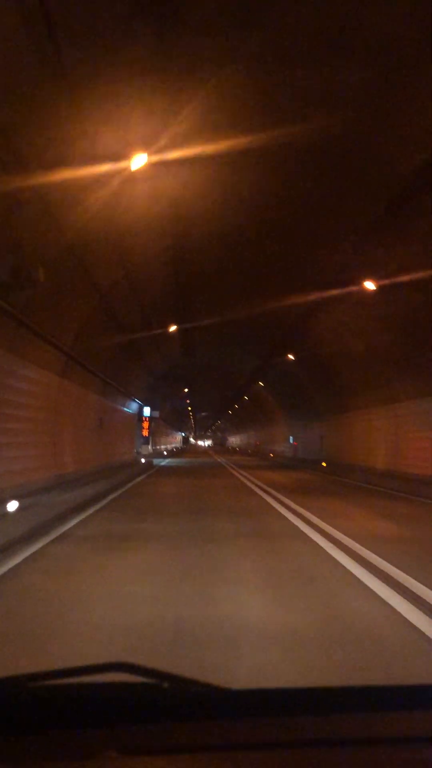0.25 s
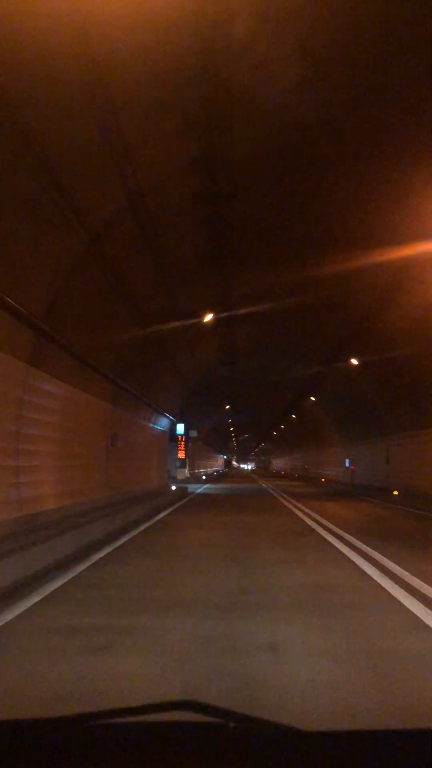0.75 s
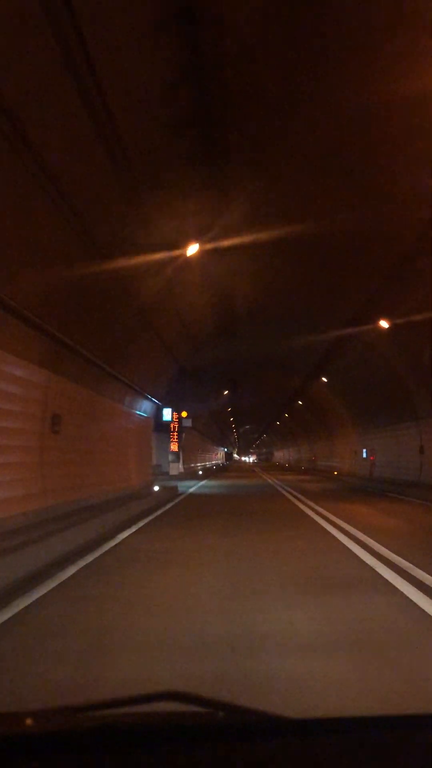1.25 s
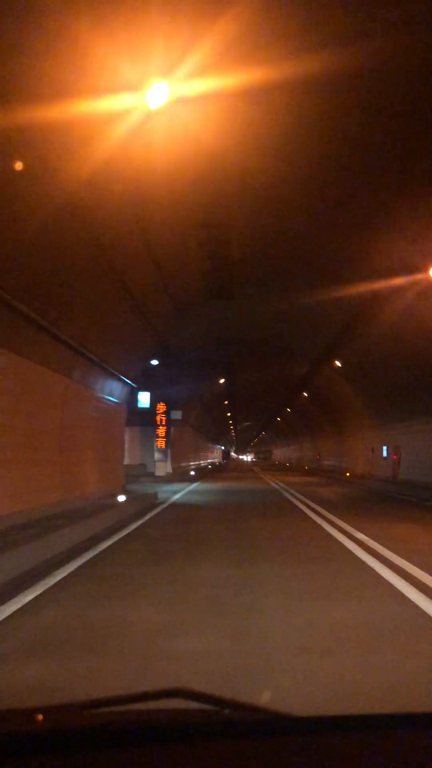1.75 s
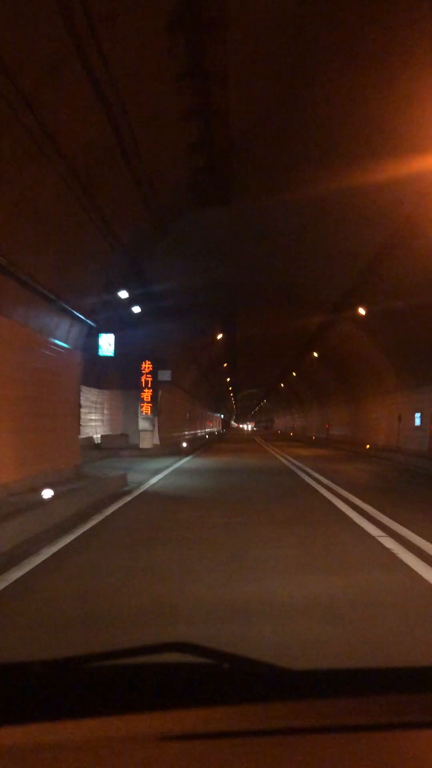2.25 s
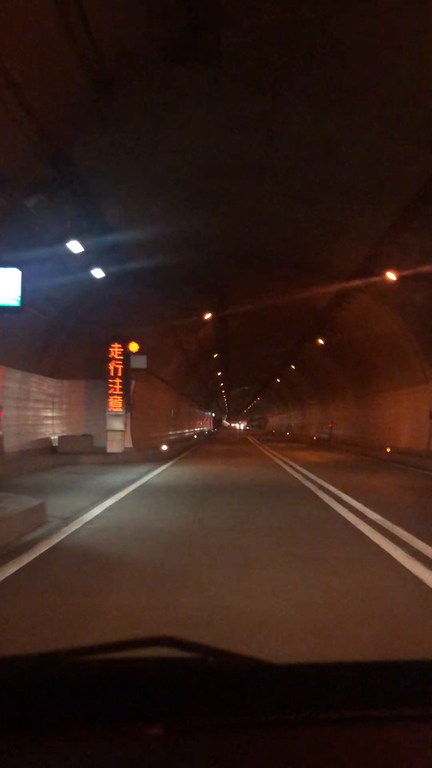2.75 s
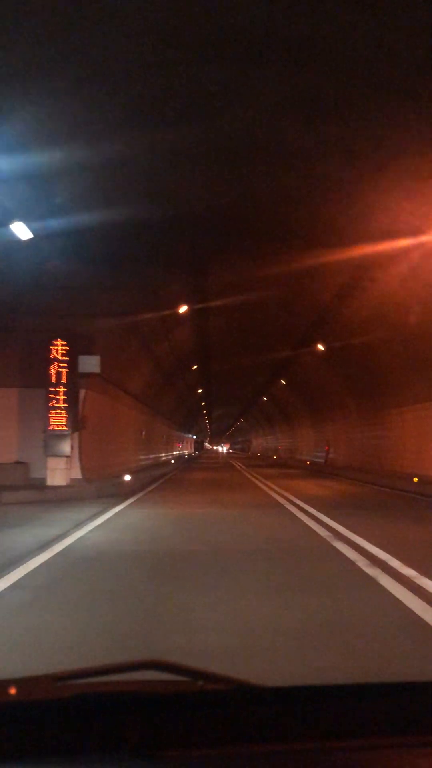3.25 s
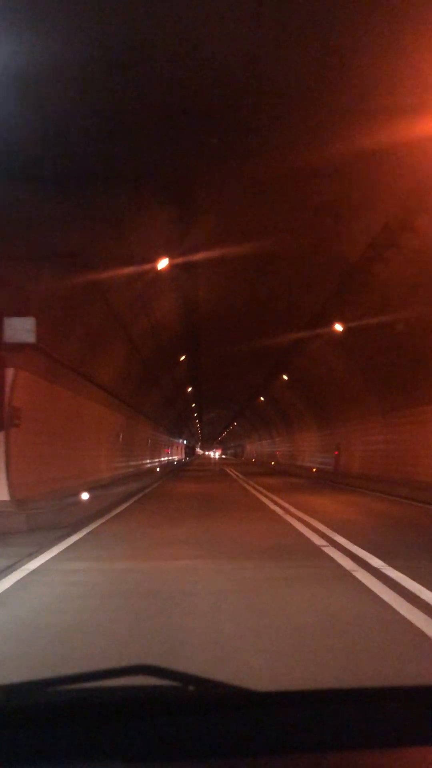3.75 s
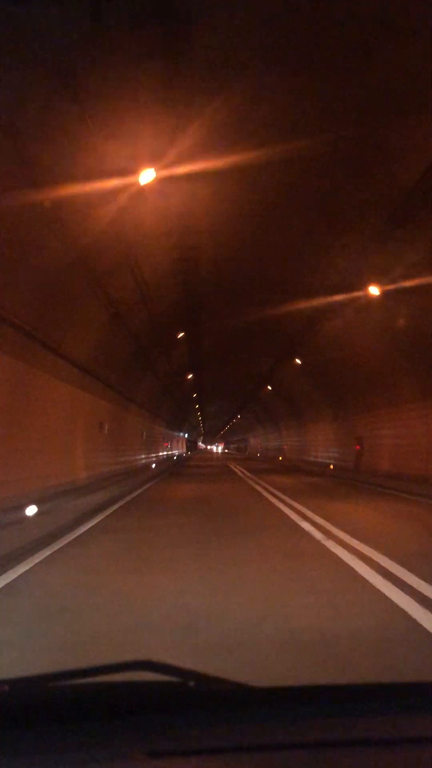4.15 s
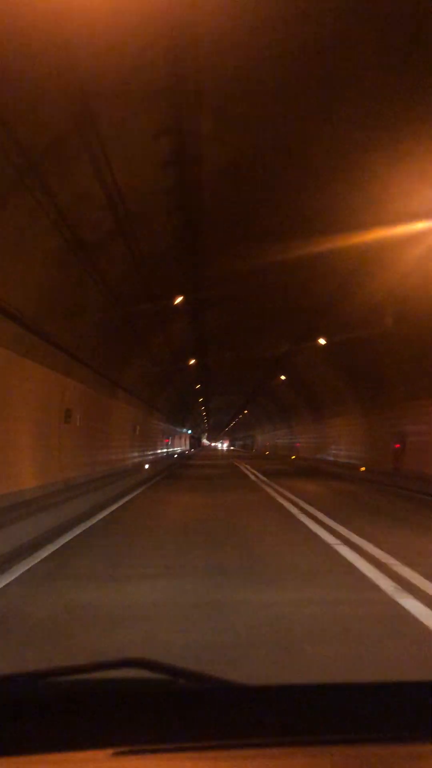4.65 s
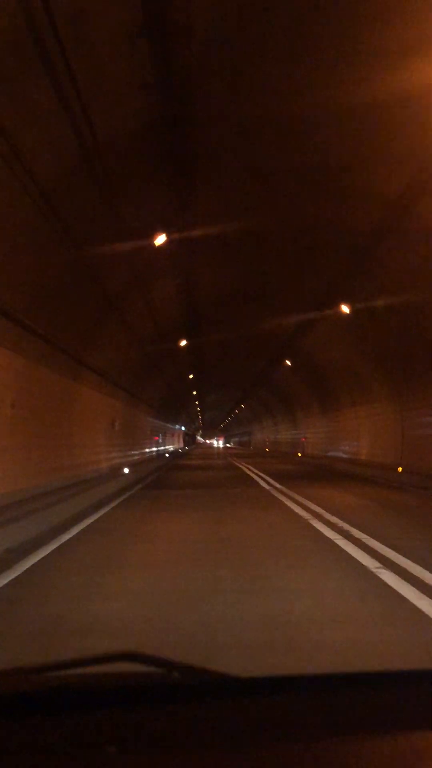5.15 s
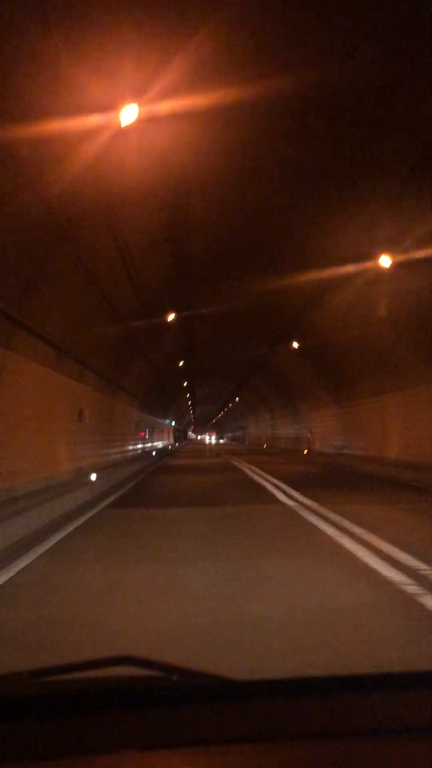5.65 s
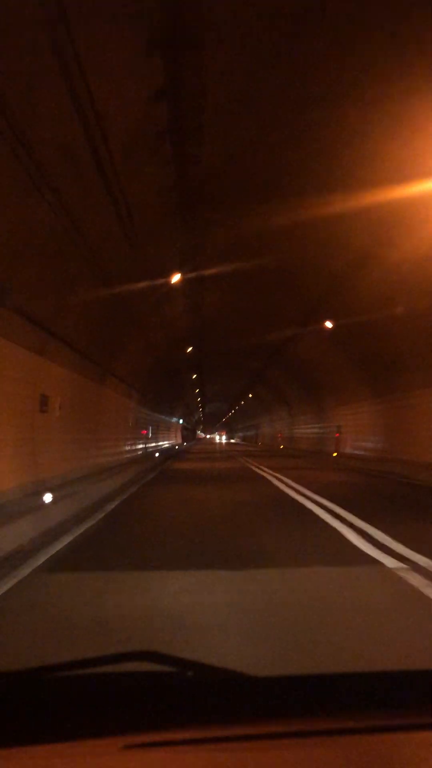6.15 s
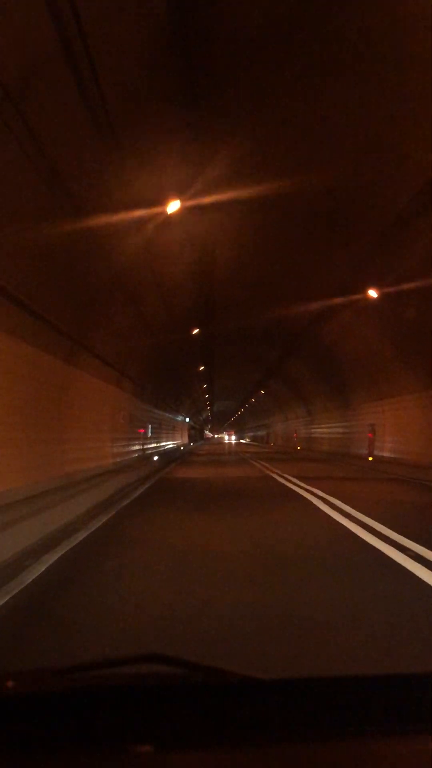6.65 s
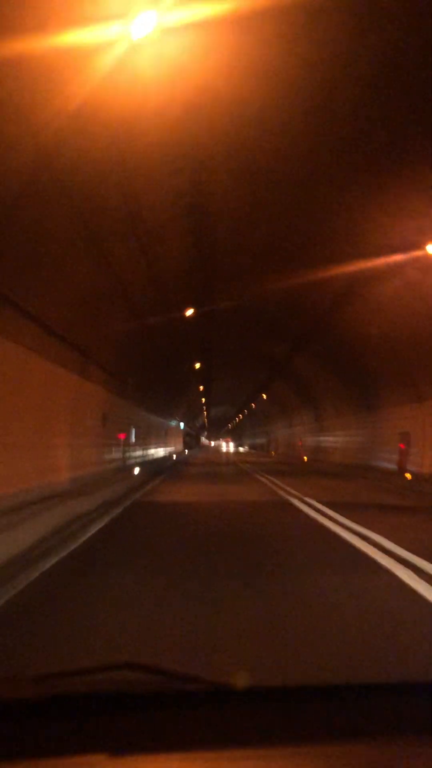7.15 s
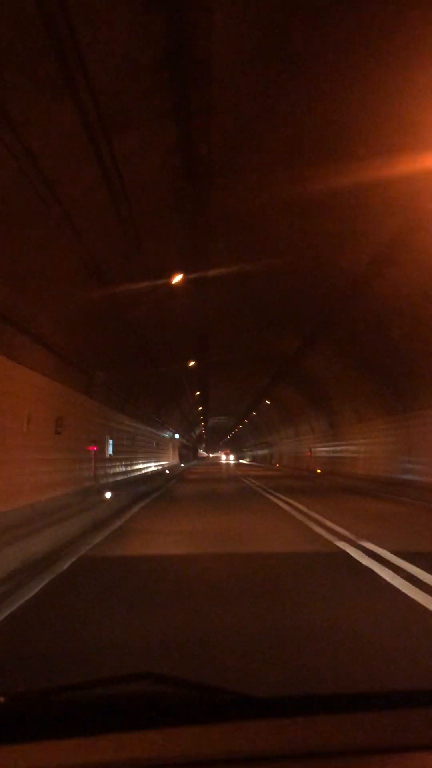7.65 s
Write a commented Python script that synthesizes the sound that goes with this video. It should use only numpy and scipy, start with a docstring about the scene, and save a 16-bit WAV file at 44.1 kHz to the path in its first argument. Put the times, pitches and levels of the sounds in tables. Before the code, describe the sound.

Low road rumble and tyre drone inside a car in a tunnel, booming harder as bumps and rough paving rattle the plastic trim.

```python
"""A car's body booms as the road shakes it, heard from the front seat, windows shut, in a road tunnel.
The road also makes the tyres ring, and the tunnel throws their roar back through the glass.
The engine hums low underneath. A joint in the road and then a stretch of rough paving
make the cabin boom harder and the loose dashboard trim rattle."""
import sys
import numpy as np
from scipy import signal
from scipy.fft import rfft, irfft, next_fast_len
from scipy.io import wavfile
from scipy.ndimage import uniform_filter1d

SR = 44100
rng = np.random.default_rng(int(sys.argv[2]) if len(sys.argv) > 2 else 0)


def generate_wav(signal):
    """Clip the signal to [-1, 1] and save it as 16-bit WAV at the path in sys.argv[1]."""
    frames = np.transpose(np.atleast_2d(signal))
    scaled = np.clip(frames, -1, 1) * 32767
    pcm = np.round(scaled).astype(np.int16)
    wavfile.write(sys.argv[1], SR, pcm)


N = 348831

# The tones of the engine's hum. Each row: multiple of the firing rate, level in dB.
ENGINE_TONES = [(1, -43.5), (2, -47), (3, -63)]
# The tunnel's roar behind the glass. Each row: frequency in Hz, relative level in dB.
ROAR_SPECTRUM = [(150, -8.5), (400, 3.5), (580, -0.5), (720, 0), (950, -0.5), (1200, -5.5), (1800, -8),
                 (2400, -13.5), (3000, -17), (3800, -19), (5500, -27), (8000, -34.5), (11000, -42.5),
                 (15500, -54)]
# Where windows and door seals ring. Each row: pitch in Hz, width in Hz, boost in dB.
GLASS_RINGS = [(704, 51, 2), (953, 61, 3), (1016, 27, 1), (1316, 20, 4.5), (1568, 38, 5), (1875, 92, 5),
               (2238, 32, 5.5), (3375, 55, 6), (3750, 78, 4), (4710, 80, 4.5)]
# The sound of rubbing trim. Each row: frequency in Hz, relative level in dB.
RUB_SPECTRUM = [(800, -14), (2500, 7.5), (4500, 8.0), (8000, 3.0), (12500, -3), (16000, -6)]
# Bouts of rubbing as the trim shifts. Each row: start in seconds, hold in seconds, level in dB.
RUB_BOUTS = [(.03, .04, -62.5), (1.06, .12, -68), (1.317, .12, -62), (1.87, .14, -65.5), (3.47, .04, -66),
             (4.05, .15, -71), (4.437, 0.077, -57), (4.57, .08, -65), (6.738, 0.046, -60.5),
             (6.86, .02, -61), (6.91, 0.038, -58), (7.04, .015, -56), (7.074, .045, -50),
             (7.26, 0.065, -62)]
# Knocks of the trim. Each row: time in seconds, level in dB, boost of the snap and ring in dB.
TRIM_KNOCKS = [(1.195, -48, -7), (4.448, -37, 7.5), (4.478, -41, -12), (4.508, -40, -11), (6.771, -45, -11),
               (6.883, -43, -13), (6.917, -40, 1), (7.016, -47, -8), (7.051, -41, 4), (7.07, -37, -1),
               (7.074, -37, 2.5), (7.101, -40, 1), (7.15, -40, -16), (7.261, -40, 6), (7.294, -48, 8),
               (7.302, -45, 9), (7.337, -42, -5), (7.399, -41, -12), (7.464, -42, -4), (7.514, -47, -8),
               (7.689, -53, 10), (7.774, -48, -6), (7.826, -50, -8), (7.886, -57, -13)]
# The plastic panel's ring. Each row: pitch in Hz, seconds to fade by 60 dB, relative level in dB.
PANEL_TONES = [(2370, .025, -2), (2890, 0.049, 1.5), (3610, 0.038, -4.5), (4670, 0.03, -13),
               (5800, 0.025, -9), (8200, .02, -19)]
# Tyre drone coming through the suspension. Each row: frequency in Hz, relative level in dB.
DRONE_SPECTRUM = [(70, -38), (130, -3.5), (175, 2.5), (215, -3), (270, -2.5), (340, -3), (362, -10),
                  (430, -14.5), (560, -25.5), (1200, -60)]
# Where the tyres and the air in them ring. Each row: pitch in Hz, width in Hz, boost in dB.
TYRE_RINGS = [(263.2, 17.3, 7.5), (284.3, 5.3, 4.5), (323.4, 21, 4), (367, 9, 2.5), (490.5, 24, 11.5)]
# The grain of the paving, heard as tyre drone. Each row: time in seconds, level in dB.
ROAD_GRAIN = [(0, -34.5), (.7, -32.5), (1.15, -34), (2.3, -34), (3.6, -33.5), (4.75, -34.5), (6.1, -33.5),
              (6.6, -34.5), (6.74, -31), (6.9, -34.5), (7.4, -35), (7.91, -39.5)]
# Blows of the road on the wheels. Each row: middle in seconds, level in dB, pitch in Hz,
# seconds to fade to about a third.
WHEEL_BUMPS = [(0.477, -19, 285, 0.0047), (0.95, -23.5, 55, 0.055), (1.954, -19.5, 70, 0.022),
               (2.419, -24, 42, .06), (4.428, -17.5, 295, 0.0075), (4.564, -17, 56.4, 0.014),
               (4.63, -15.5, 42.3, .04), (4.706, -16.5, 52, 0.018), (6.711, -26, 280, 0.013),
               (6.743, -21, 115, 0.021), (7.1, -11, 44.3, 0.027), (7.143, -24, 185, 0.018),
               (7.214, -12.5, 51.7, 0.018)]
# The boom of the car's body. Each row: frequency in Hz, relative level in dB.
BOOM_SPECTRUM = [(15, -46), (25, -34), (32, -30), (39, -2.5), (60, 0), (85, -2), (120, -3), (142, -10),
                 (190, -18), (280, -26), (500, -51), (1200, -74.5)]
# Where the cabin air rings (standing waves). Each row: pitch in Hz, width in Hz, boost in dB.
CABIN_RINGS = [(40.2, 3.1, 7), (73.7, 7.3, 0), (92, 17, 1), (125.2, 4.2, 7)]
# How hard the road shakes the body, most at the joint and the rough paving.
# Each row: time in seconds, level in dB.
BODY_SHAKE = [(0, -28), (.55, -27), (.75, -29.5), (1.7, -28.5), (2.35, -27), (2.95, -28), (3.25, -26.5),
              (3.8, -28), (4.2, -25), (4.65, -24.5), (4.85, -27.5), (6.0, -30), (6.7, -28), (6.8, -22),
              (7.3, -21.5), (7.65, -23.5), (7.85, -23.5), (7.91, -21)]

PATCHES_PER_S = 6  # the paving varies from patch to patch


def gain(db):
    """Turn decibels into a number to multiply by."""
    return 10 ** (np.asarray(db) / 20)


def normalise(x):
    """Scale a sound to an average (rms) level of 1."""
    return x / np.sqrt(np.mean(x ** 2))


def curve(table):
    """Join rows of time and level with straight lines."""
    times, levels = np.array(table).T
    return np.interp(np.arange(N) / SR, times, levels)


def wander(per_s):
    """A smooth random drift, typically about 1 away from zero."""
    hold = int(SR / per_s)
    steps = np.repeat(rng.standard_normal(N // hold + 1), hold)
    return 1.304 * uniform_filter1d(uniform_filter1d(steps, hold), hold)[:N]


def colour(x, spectrum, rings=()):
    """Give a sound a broad tone with ringing pitches standing out; its level comes out as 1."""
    size = next_fast_len(N)
    hz = np.maximum(np.fft.rfftfreq(size, 1 / SR), 1)
    points = np.array(spectrum)
    db = np.interp(np.log(hz), np.log(points[:, 0]), points[:, 1])
    for centre, width, boost in rings:
        db = db + boost / (1 + (2 * (hz - centre) / width) ** 2)
    return normalise(irfft(rfft(x, size) * gain(db), size)[:N])


def steady(x, span_s):
    """Even out the slow swells of a vibration, keeping its quick flutter."""
    span = max(int(span_s * SR), 1)
    return x / np.sqrt(uniform_filter1d(uniform_filter1d(x ** 2, span), span) + 1e-9)


def reflect(x, spread_s, echo_db, count=24):
    """Add many faint echoes off glass and trim; the level comes out as 1."""
    out = x.copy()
    lags = rng.integers(60, int(spread_s * SR) + 61, count)
    for lag, size in zip(lags, rng.standard_normal(count)):
        out[lag:] += gain(echo_db) * size * x[:-lag]
    return normalise(out)


def add(track, start_s, sound):
    """Mix a short sound in at a given time."""
    i = min(max(int(start_s * SR), 0), N)
    track[i:i + len(sound)] += sound[:N - i]


def engine_hum(firing_hz=74.16):
    """The engine fires at a nearly even speed and load, making a few low tones."""
    phase = 2 * np.pi * np.cumsum(firing_hz * (1 + 0.0068 * wander(1.987))) / SR
    return sum(gain(db + 2 * wander(5)) * np.sqrt(2) * np.sin(round(multiple) * phase)
               for multiple, db in ENGINE_TONES)


def tunnel_roar(level_db=-42, ease_db=0.6):
    """Tyre hiss, smoothed by countless wall echoes, comes back in through the windows."""
    hiss = colour(rng.standard_normal(N), ROAR_SPECTRUM, GLASS_RINGS)
    roar = reflect(hiss, spread_s=.06, echo_db=-26.5)
    grain_db = curve(ROAD_GRAIN)
    paving_db = 0.23 * (grain_db - grain_db.mean())  # a little louder when the tyres drone more
    easing_db = ease_db * np.linspace(.5, -.5, N)
    return roar * gain(level_db + easing_db + paving_db + 0.47 * wander(7))


def trim_rubbing(contacts_per_s=5000, usual_db=-74, rise_s=0.017, fall_s=.035):
    """Loose trim rubs in tiny contacts: faintly with the shaking, in bouts as the dashboard sways."""
    contacts = (rng.random(N) < contacts_per_s / SR) * rng.standard_normal(N)
    rub = colour(contacts * gain(2.6 * wander(160)), RUB_SPECTRUM)
    t, shake_db = np.arange(N) / SR, curve(BODY_SHAKE)
    power = gain(usual_db + 1.8 * (shake_db - np.median(shake_db))) ** 2
    for start, hold, db in RUB_BOUTS:
        rise = np.clip(1 + (t - start) / rise_s, 0, 1)
        fall = np.exp(-np.maximum(t - start - hold, 0) / fall_s)
        power = power + (gain(db) * rise * fall) ** 2
    return reflect(rub, spread_s=.015, echo_db=-27) * np.sqrt(power)


def trim_knocks(rise_s=0.00082, fade_s=0.015, ring_db=-9, typical_rebound_s=0.0044, rebound_db=-11):
    """Trim scrapes into place: a bright crack, a duller snap, a plastic ring and a weaker rebound."""
    out, t = np.zeros(N), np.arange(-int(SR / 100), int(SR / 10)) / SR
    after = np.maximum(t, 0)
    contact = np.exp(np.minimum(t, 0) / rise_s) * gain(-60 * after / fade_s)
    bright = signal.butter(1, [3500, 12500], "band", fs=SR, output="sos")
    dull = signal.butter(2, [1500, 5500], "band", fs=SR, output="sos")
    for when, db, snap_db in TRIM_KNOCKS:
        grit = 0.55 * rng.standard_normal((2, len(t))) * contact
        crack = signal.sosfilt(bright, grit[0])
        snap = gain(snap_db) * signal.sosfilt(dull, grit[1])
        ring = np.zeros(len(t))
        for hz, ring_s, tone_db in PANEL_TONES:
            pitch = hz * (1 + 0.047 * rng.standard_normal())  # no two knocks ring alike
            ring += gain(tone_db - 60 * after / ring_s) * np.sin(2 * np.pi * pitch * after)
        knock = gain(db) * (crack + snap + gain(ring_db + snap_db) * ring)
        add(out, when + t[0], knock)
        add(out, when + t[0] + typical_rebound_s * (.5 + rng.random()), gain(rebound_db) * knock)
    return out


def tyre_drone(patchy_db=0.92, thud_band_hz=(158.7, 209.7), thud_db=-13.5):
    """The road's grain drums on the tyres and rings the air inside; shaking makes their walls thud."""
    drone = steady(colour(rng.standard_normal(N), DRONE_SPECTRUM, TYRE_RINGS), span_s=0.21)
    walls = signal.butter(2, thud_band_hz, "band", fs=SR, output="sos")
    thud = steady(normalise(signal.sosfilt(walls, rng.standard_normal(N))), span_s=0.16)
    drone_db = curve(ROAD_GRAIN) + patchy_db * wander(PATCHES_PER_S)
    return drone * gain(drone_db) + thud * gain(curve(BODY_SHAKE) + thud_db)


def wheel_bumps():
    """Each blow from the road swells and dies within a few swings, softened by tyre and spring."""
    out, t = np.zeros(N), np.arange(-int(SR / 4), int(SR / 4)) / SR
    for middle, db, hz, fade_s in WHEEL_BUMPS:
        swell = np.exp(-(t / fade_s) ** 2)
        tone = np.sin(2 * np.pi * (hz * t + rng.random()))
        add(out, middle + t[0], gain(db) * swell * tone)
    return out


def body_boom(patchy_db=1.0, heave_below_hz=85):
    """Uneven paving shakes the car's body, which pumps the air of the cabin."""
    shake_db = curve(BODY_SHAKE)
    boom = steady(colour(rng.standard_normal(N), BOOM_SPECTRUM, CABIN_RINGS), span_s=0.11)
    # Long, hard shaking goes mostly into the slow heave of the large panels.
    extra_db = np.maximum(uniform_filter1d(shake_db, int(SR / 4)) - np.median(shake_db), 0)
    heave = signal.sosfiltfilt(signal.butter(3, heave_below_hz, fs=SR, output="sos"), boom)
    boom = boom + heave * (gain(1.7 * extra_db) - 1)
    return steady(boom, span_s=0.079) * gain(shake_db + patchy_db * wander(PATCHES_PER_S))


def scene():
    """All the sounds meet at one spot behind the windscreen, in one channel."""
    road = body_boom() + wheel_bumps() + tyre_drone() + tunnel_roar()
    return (road + engine_hum() + trim_rubbing() + trim_knocks())[None]


def record(dry):
    """Fade quickly in and out, and cut the treble above 15550 Hz."""
    t = np.arange(N) / SR
    fade = np.minimum(np.minimum(t, t[::-1]) / .004, 1)
    treble_cut = signal.ellip(10, .1, 80, 15550, fs=SR, output="sos")
    return signal.sosfilt(treble_cut, dry * np.sin(np.pi / 2 * fade) ** 2)


dry = scene()
out = record(dry)
generate_wav(out)
```